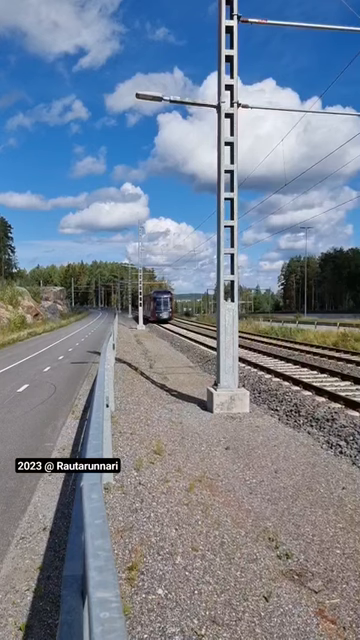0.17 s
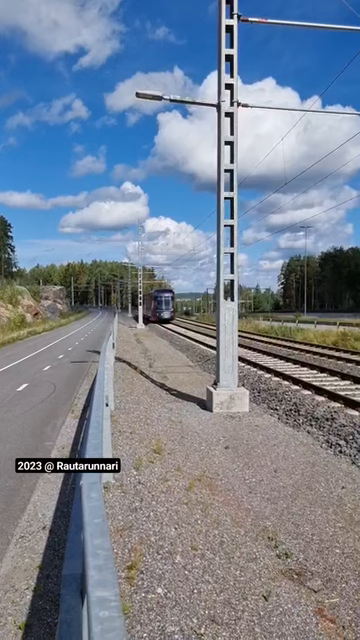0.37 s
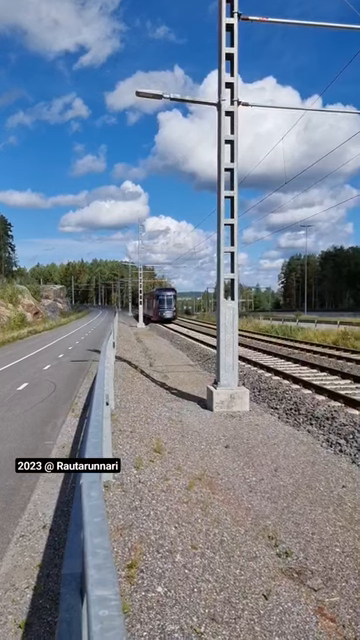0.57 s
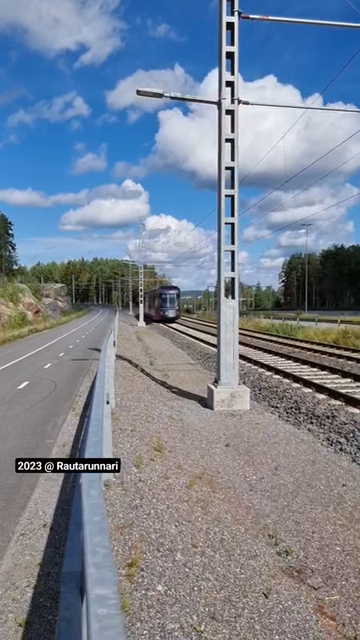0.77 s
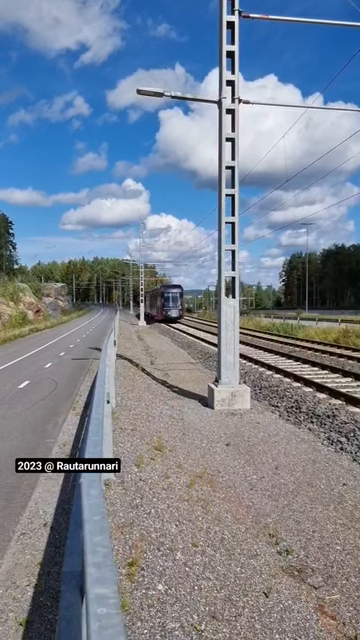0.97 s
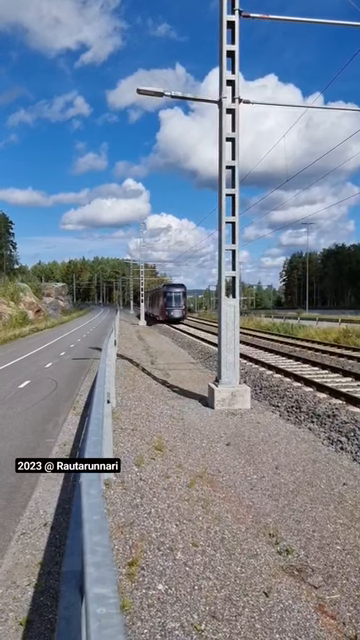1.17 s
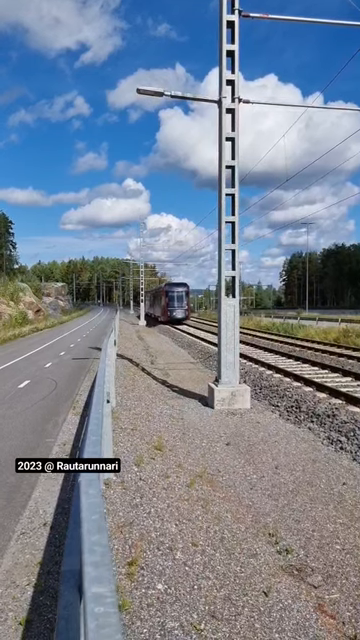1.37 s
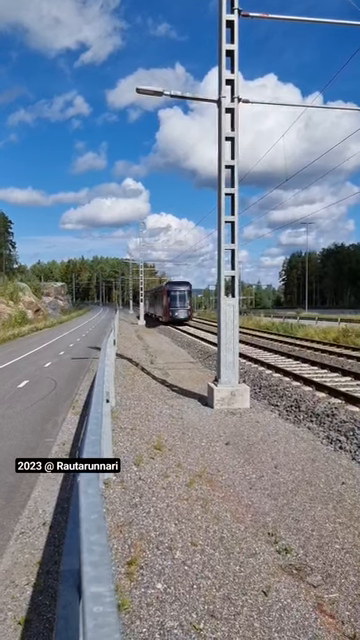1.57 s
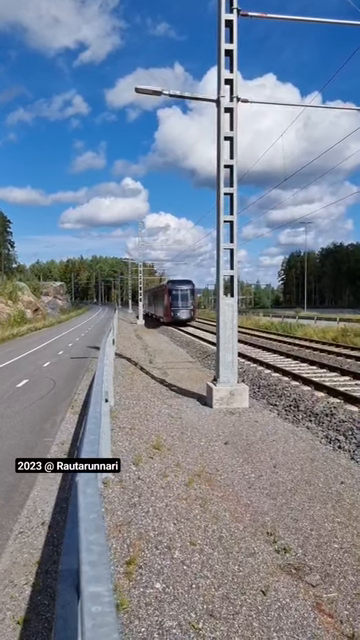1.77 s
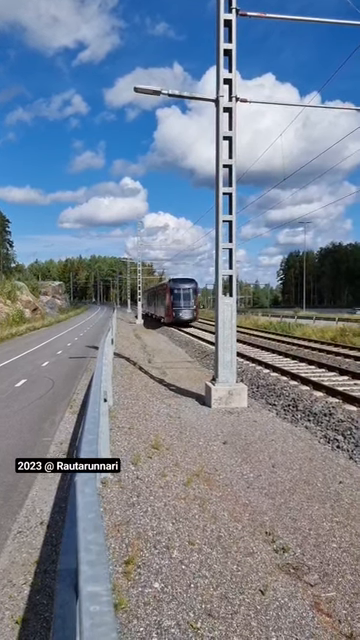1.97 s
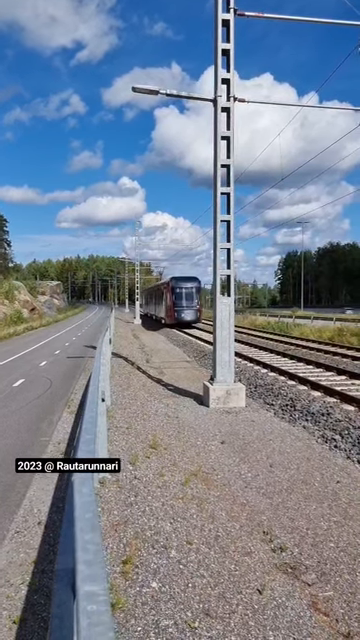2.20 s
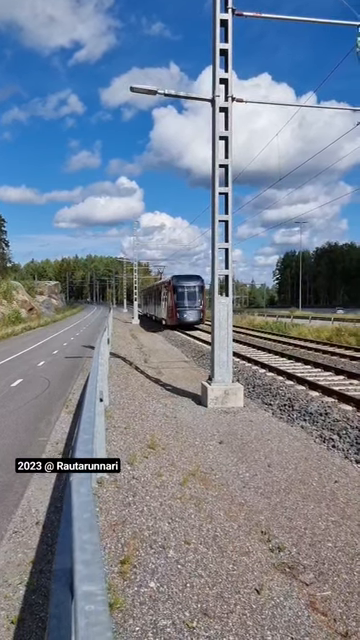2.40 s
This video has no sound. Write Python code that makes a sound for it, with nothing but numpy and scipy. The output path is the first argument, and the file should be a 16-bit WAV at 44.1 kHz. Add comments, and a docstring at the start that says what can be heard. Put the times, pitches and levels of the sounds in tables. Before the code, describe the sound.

A distant tram approaches on open track, its rails singing with a thin metallic ring over a soft rolling roar that swells slightly. Short wind gusts rumble and thump on the microphone throughout, above a faint outdoor hiss.

```python
"""A thin outdoor hiss and a breeze rumbling on the two microphone ports open out of silence.
Far off on open track, a tram's wheels set the rails singing ahead of it in narrow bands, 0.6 to 2 kHz,
over a soft rolling roar. Short gusts buffet the ports throughout; near 1.3 and 1.5 s the hardest
shed vortices that thump, and the tram's sound ducks briefly. It swells slightly overall, and rough
spots on the rail make the singing flare, most at 2.2 s."""
import sys
import numpy as np
from scipy import signal
from scipy.fft import rfft, irfft
from scipy.io import wavfile
from scipy.ndimage import uniform_filter1d

SR = 44100
rng = np.random.default_rng(int(sys.argv[2]) if len(sys.argv) > 2 else 0)


def wrap_up_sound(samples):
    """Save the sound to the file named by the first command line argument, as 16-bit audio."""
    columns = np.atleast_2d(samples).T
    # keep every value between -1 and 1, then stretch to whole-number steps
    tamed = np.clip(columns, -1, 1)
    steps = np.round(tamed * 32767).astype(np.int16)
    wavfile.write(sys.argv[1], SR, steps)


N = 112014
TIME = np.arange(N) / SR
FREQS = np.maximum(np.fft.rfftfreq(N, 1 / SR), 1)


def from_db(db):
    """Decibels to gain."""
    return 10 ** (np.asarray(db) / 20)


def unit_rms(x):
    """Scale to rms 1."""
    return x / np.sqrt(np.mean(x ** 2) + 1e-20)


def over_time(points):
    """Piecewise-linear curve over time."""
    return np.interp(TIME, *np.transpose(points))


def over_hz(points):
    """Piecewise-linear curve over log frequency."""
    hz, value = np.transpose(points)
    return np.interp(np.log(FREQS), np.log(hz), value)


def swell(at_s, half_s):
    """Gaussian pulse, height 1."""
    return np.exp(-((TIME - at_s) / half_s) ** 2)


def drift(rate_hz):
    """Low-passed random wander, rms 1."""
    return unit_rms(irfft(rfft(rng.standard_normal(N)) / (1 + (FREQS / rate_hz) ** 2), N))


def stereo_noise(gain, coherence, balance_db=0, lead_rad=0):
    """Coloured, partly coherent noise, rms 1; balance and lead are left against right."""
    shared, *own = rfft(rng.standard_normal((3, N)))
    left, right = np.sqrt(coherence) * shared + np.sqrt(1 - coherence) * np.array(own)
    left = left * from_db(balance_db / 2) * np.exp(1j * lead_rad)
    right = right * from_db(-balance_db / 2)
    return unit_rms(irfft(gain * np.array([left, right]), N))


def levelled(x, span_s):
    """Hold short-time rms near 1."""
    size = int(span_s * SR)
    power = np.mean(x ** 2, axis=0)
    return x / np.sqrt(uniform_filter1d(uniform_filter1d(power, size), size) + 1e-9)


def port_split(correlation):
    """Power shares driving the two ports in phase and in antiphase."""
    alike = np.clip(correlation, -1, 1)
    return np.array([[1 + alike], [1 - alike]]) / 2


# Flares from rough spots on the rail: t/s, f/Hz, rise/dB
ROUGH_SPOTS = [(.615, 1030, 7), (.7, 1340, 7), (1.161, 1143, 11.5), (1.98, 2020, 11), (2.12, 1230, 5.5),
               (2.185, 1132, 16.5), (2.25, 1750, 5.5), (2.43, 2930, 8.5)]

def ringing(modes, coherence, flutter_db=2, flare_s=0.032, flare_width_hz=104):
    """Wheel roughness drives narrow resonances; each flutters and flares near a rough spot's pitch."""
    out, power = 0, 0
    for hz, width_hz, db, balance_db, lead_rad in modes:
        resonance = 1 / (1 + ((FREQS - hz) / (0.85 * width_hz)) ** 2)
        ring = levelled(stereo_noise(resonance, coherence, balance_db, lead_rad), span_s=0.31)
        flare_db = sum(rise_db * swell(at_s, flare_s) * np.exp(-((hz - at_hz) / flare_width_hz) ** 2)
                       for at_s, at_hz, rise_db in ROUGH_SPOTS)
        out = out + from_db(db + flare_db + flutter_db * drift(rate_hz=10)) * ring
        power += from_db(db) ** 2
    return out / np.sqrt(power)


# Rail and air hiss: f/Hz, relative density/dB
HISS_SPECTRUM = [(1500, -1.5), (2600, 1.5), (3700, -3), (6800, -6), (8200, -10), (10400, -8), (11300, -16),
                 (12500, -9.5), (15000, -13)]
# Wheel resonances: f/Hz, width/Hz, relative level/dB, balance/dB, lead/rad
WHEEL_RESONANCES = [(2884, 124, -0.5, 3.5, -1.58), (3384, 150, -9, 5, -0.12), (4040, 50, -11, -5, 0.61),
                    (4188, 69, -9, -4, 0.94), (7090, 31, -12, 8, -0.85)]
# Envelope of hiss and ring together: t/s, level/dB
TREBLE_LEVEL = [(.15, -60.5), (.31, -57.5), (.46, -57.5), (.61, -59), (.8, -59), (.92, -57.5),
                (1.53, -56.5), (2.22, -56), (2.44, -54.5), (2.54, -53)]
# Wheel ring against that envelope: t/s, level/dB
RING_LEVEL = [(.15, -6), (.6, -5.5), (.72, -13), (.95, -9), (1.5, -5.5), (2.25, -4.5), (2.54, -3.5)]

def hiss(air_db=1.07):
    """Wide hiss of rails and open air with the faint high ring of the wheels, growing slowly."""
    air = stereo_noise(from_db(over_hz(HISS_SPECTRUM)), coherence=0.027, balance_db=-0.7)
    ring = from_db(over_time(RING_LEVEL)) * ringing(WHEEL_RESONANCES, coherence=0.76)
    return from_db(over_time(TREBLE_LEVEL)) * (from_db(air_db) * air + ring)


# Breeze on the ports: t/s, level/dB
BREEZE_LEVEL = [(.15, -37), (.35, -42.5), (.42, -48.5), (.6, -51), (.8, -42.5), (.97, -44), (1.2, -53),
                (1.33, -35.5), (1.58, -33), (1.64, -39.5), (1.73, -35), (1.84, -40.5), (1.89, -47),
                (1.98, -34.5), (2.15, -41.5), (2.3, -32), (2.38, -36.5), (2.54, -32.5)]
# Gusts: t/s, half length/s, rumble/dB, buffet/dB, left-right rumble correlation
PORT_GUSTS = [(0.193, 0.015, -29.5, -44.5, 0.89), (0.297, 0.047, -34.5, -47, 0.55),
              (0.566, 0.016, -43, -42, -0.45), (0.669, 0.03, -35.5, -52, 0.91),
              (0.823, 0.018, -31, -42, -0.35), (0.891, 0.02, -26.5, -40, -0.89),
              (1.05, 0.016, -31, -58, .8), (1.099, 0.017, -29, -42, 1), (1.168, 0.016, -30, -42.5, -0.25),
              (1.223, 0.011, -30, -40, .4), (1.273, 0.024, -26.5, -22.5, 0.08), (1.41, 0.01, -38, -32, .5),
              (1.507, 0.011, -27, -22.5, 1), (1.78, 0.02, -26, -36.5, -0.41),
              (2.034, 0.019, -30.5, -38, -0.16), (2.256, 0.01, -45, -32.5, -0.071),
              (2.422, 0.032, -31, -33, -1.1), (2.52, 0.012, -23, -42, -0.098)]
# Large eddies: f/Hz, relative density/dB
RUMBLE_SPECTRUM = [(10, -42), (22, -17), (35, -8), (50, 2.5), (64, 0), (79, 4.5), (95, -3.5), (118, -8.5),
                   (140, -10.5), (170, -16.5), (220, -17), (330, -30.5), (450, -63), (2000, -100)]
# Small eddies: f/Hz, relative density/dB
BUFFET_SPECTRUM = [(25, -52), (70, -5), (130, 2.5), (200, -3.5), (270, -5), (305, -7), (336, -6.5),
                   (430, -18.5), (520, -12.5), (700, -41), (1200, -38), (2500, -100)]
# Left port's phase in a buffet: f/Hz, lead/rad
BUFFET_PHASE = [(150, -0.07), (250, -2.5), (400, -3.5)]

def wind(flutter_db=3, breeze_buffet_db=-16, eddy_s=0.022):
    """Breeze and gusts shed eddies at the ports: large ones rumble, small ones buffet."""
    breeze_power = from_db(over_time(BREEZE_LEVEL) + flutter_db * drift(rate_hz=10.5)) ** 2
    rumble_power = breeze_power * port_split(correlation=0.33)
    buffet_power = breeze_power * from_db(breeze_buffet_db) ** 2
    for at_s, half_s, rumble_db, buffet_db, correlation in PORT_GUSTS:
        gust = swell(at_s, half_s)
        rumble_power += from_db(rumble_db) ** 2 * gust * port_split(correlation)
        buffet_power += from_db(buffet_db) ** 2 * gust
    large = stereo_noise(from_db(over_hz(RUMBLE_SPECTRUM)), coherence=0)
    large = [levelled(noise[None], eddy_s)[0] for noise in large]
    in_phase, antiphase = np.sqrt(rumble_power) * large
    rumble = np.array([in_phase + antiphase, in_phase - antiphase])
    small = stereo_noise(from_db(over_hz(BUFFET_SPECTRUM)), coherence=0.4, lead_rad=over_hz(BUFFET_PHASE))
    return rumble + np.sqrt(buffet_power) * levelled(small, eddy_s)


# Vortex trains: t/s, half length/s, level/dB, shedding f/Hz
VORTEX_TRAINS = [(1.264, .012, -19.5, 105.4), (1.283, 0.011, -27, 179.4), (1.515, 0.008, -34, 320.8)]

def thumps(wander=0.15, correlation=0.8):
    """The hardest gusts shed vortices at an unsteady rate, nearly in step on both ports."""
    out, lag_rad = 0, np.arccos(correlation)
    for at_s, half_s, db, hz in VORTEX_TRAINS:
        shedding_hz = hz * (1 + wander * drift(hz))
        phase = 2 * np.pi * np.cumsum(shedding_hz) / SR
        envelope = from_db(db) * np.sqrt(2 * swell(at_s, half_s))
        out = out + envelope * np.sin([phase, phase - lag_rad])
    return out


# Rolling roar: f/Hz, relative density/dB
ROAR_SPECTRUM = [(100, 3), (300, -2), (480, -4.5), (720, 1), (900, 5.5), (1300, -4.5), (1750, -5),
                 (1900, -28), (2300, -17.5), (4000, -52)]
# Lean of the roar: f/Hz, balance/dB
ROAR_LEAN = [(550, -2.5), (900, -6), (1700, 18), (2000, 11)]
# Rail and wheel resonances: f/Hz, width/Hz, relative level/dB, balance/dB, lead/rad
RAIL_RESONANCES = [(602, 52, -7, 1, 0), (1014, 39, -2, -4.5, -2), (1043, 31, -1.5, -6, -2),
                   (1074.2, 11.4, 1.5, -16, -2), (1176, 15, -4, -12, -3), (1251.5, 45, -2, -12, 1.3),
                   (1346, 60, -0.5, -4, 1), (1475, 38, -8.5, -3, 0.5), (1558, 33, -3.5, -6, 0.5),
                   (1623, 28, -3.5, -6, 0.23), (1685.4, 25, -1.5, -6.5, 0.74), (1756, 32, -1, -5.5, 0.5),
                   (1936, 60, -9, -1, 1), (2018, 67, -9.5, 10, 0), (2152, 31, -17, -6, 1.1)]
# Envelope of singing and roar together: t/s, level/dB
TRAM_LEVEL = [(.15, -44.5), (.23, -46), (.31, -42), (.43, -43.5), (.69, -41.5), (.82, -41.5), (1.17, -43),
              (1.26, -44), (1.39, -40), (1.51, -45.5), (1.56, -41.5), (1.95, -41.5), (2.2, -39.5),
              (2.43, -42.5), (2.5, -39.5)]

def tram(singing_db=1.5, roar_db=-4):
    """Wheels on rails: singing and roar swell slightly and duck briefly under the hardest gusts."""
    roar = stereo_noise(from_db(over_hz(ROAR_SPECTRUM)), coherence=0.4,
                        balance_db=over_hz(ROAR_LEAN), lead_rad=0.17)
    singing = ringing(RAIL_RESONANCES, coherence=0.85)
    return from_db(over_time(TRAM_LEVEL)) * (from_db(singing_db) * singing + from_db(roar_db) * roar)


def scene():
    """Tram, hiss and wind at the microphone."""
    return tram() + hiss() + wind() + thumps()


def record(dry, start_s=0.131, fade_s=0.015, cutoff_hz=15500):
    """Silent lead-in, quick fades at both ends, steep low-pass."""
    fade = np.clip(np.minimum(TIME - start_s, TIME[-1] - TIME) / fade_s, 0, 1)
    lowpass = signal.ellip(12, 0.1, 80, cutoff_hz, fs=SR, output="sos")
    return signal.sosfilt(lowpass, dry * fade)


dry = scene()
out = record(dry)
wrap_up_sound(out)
```